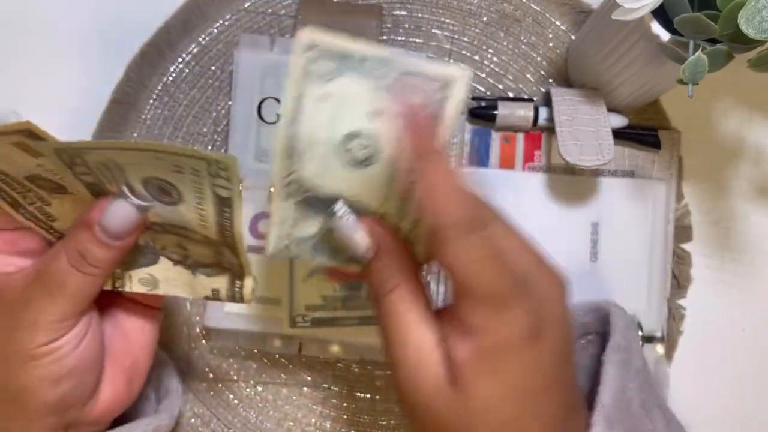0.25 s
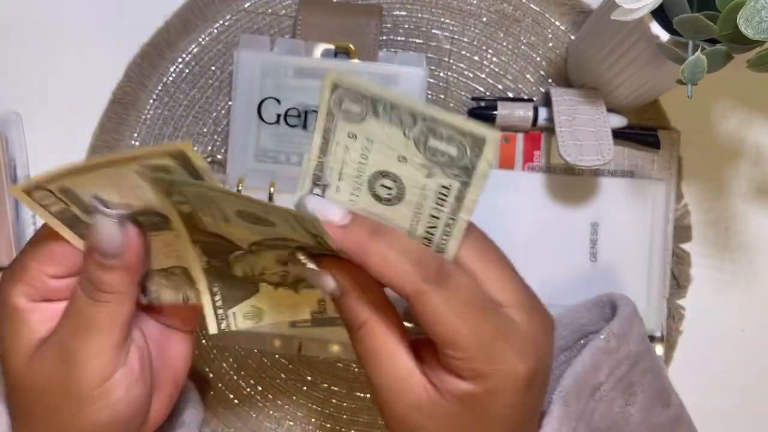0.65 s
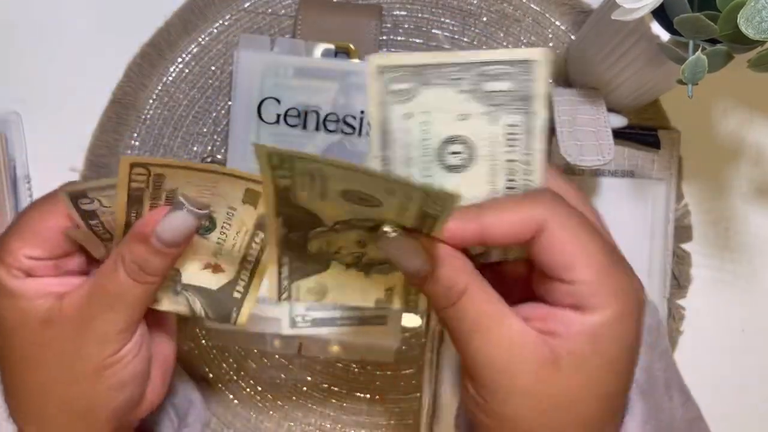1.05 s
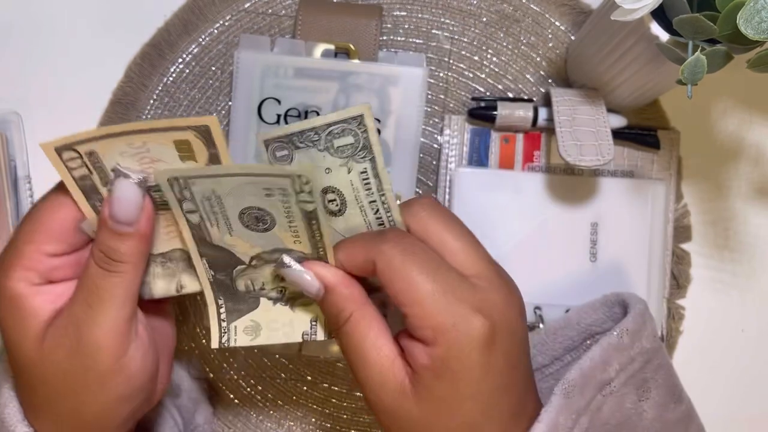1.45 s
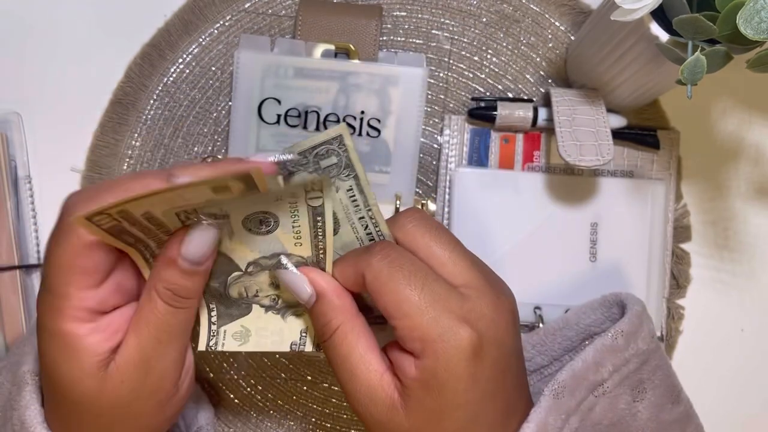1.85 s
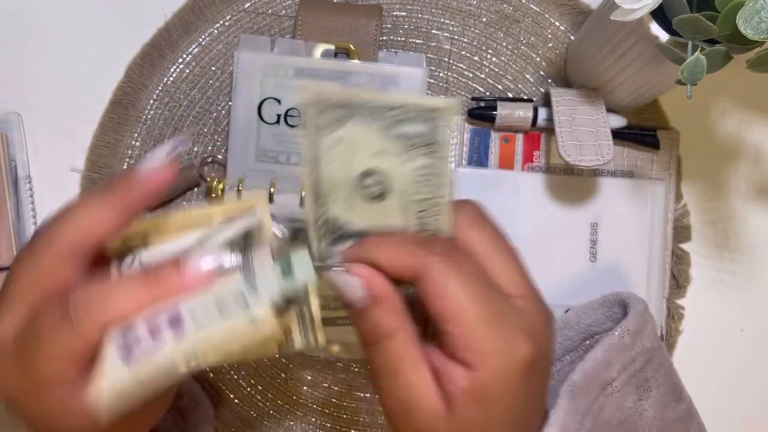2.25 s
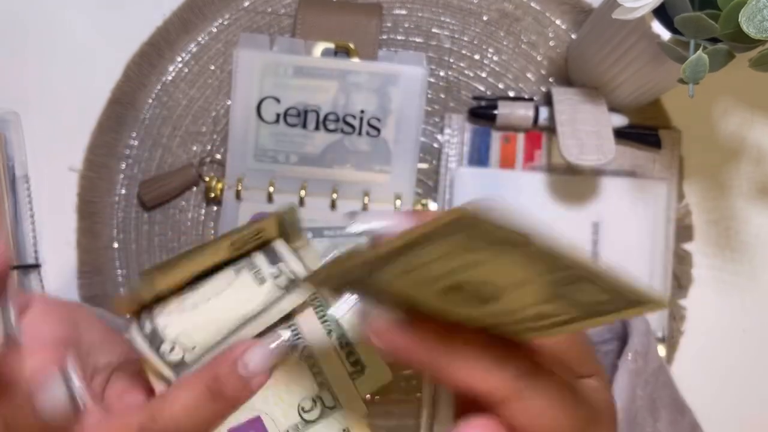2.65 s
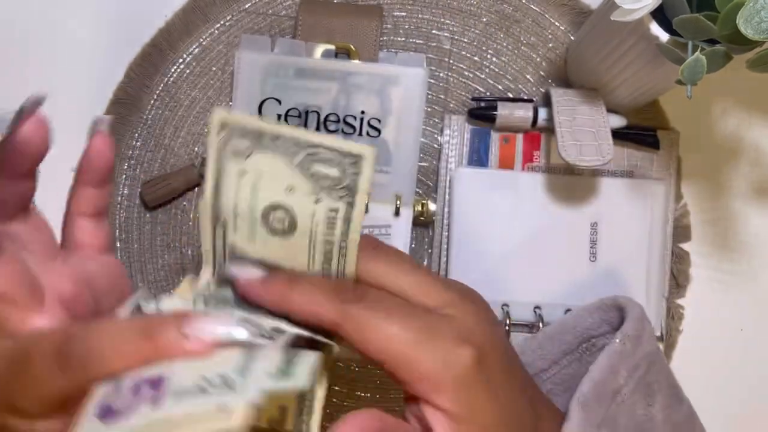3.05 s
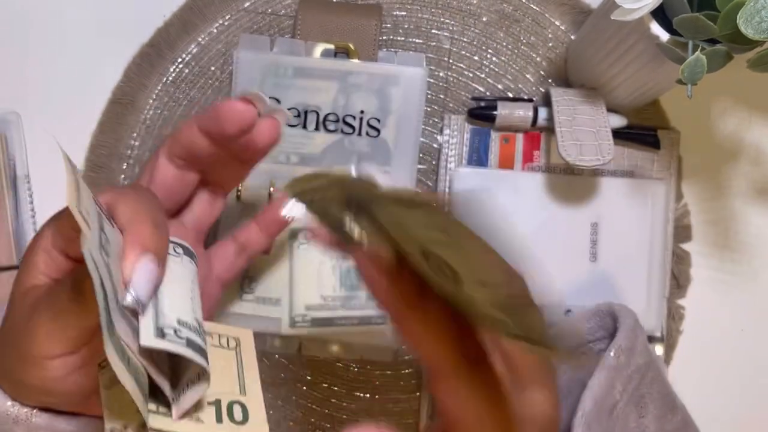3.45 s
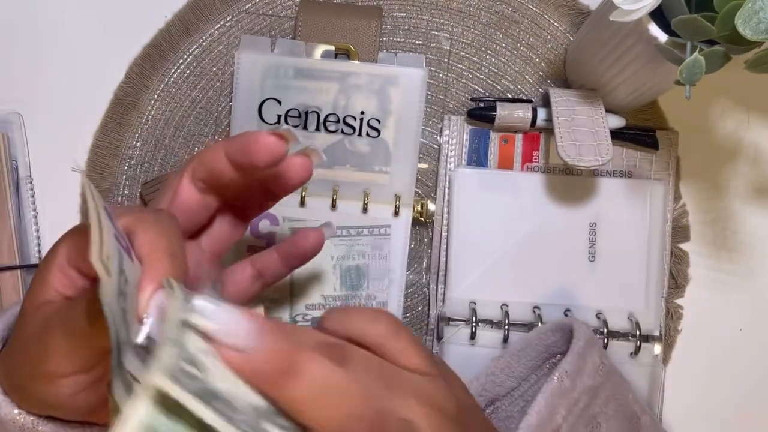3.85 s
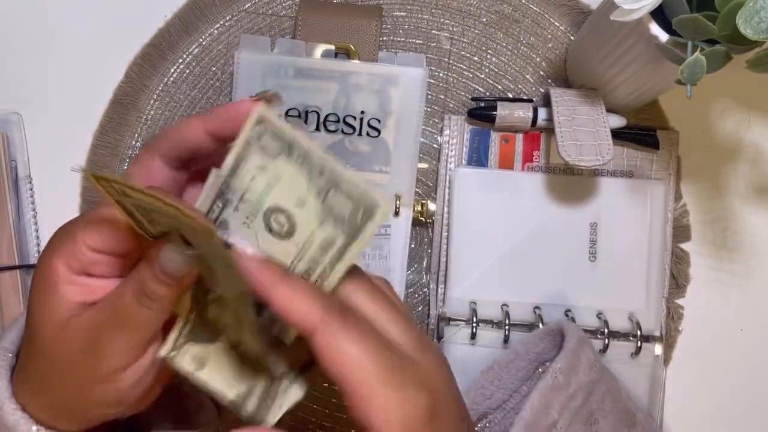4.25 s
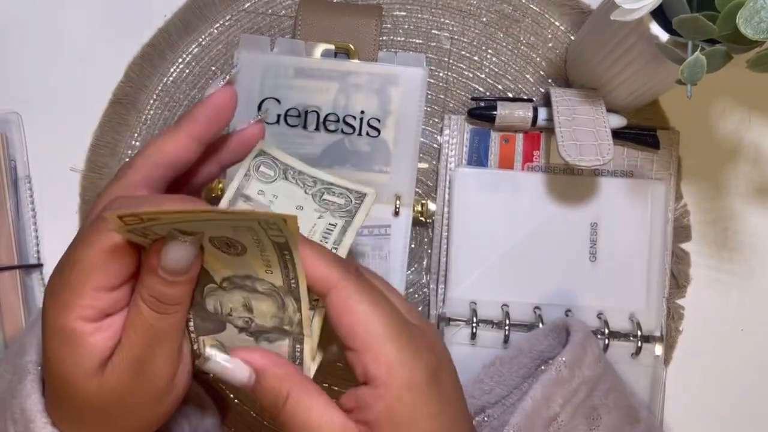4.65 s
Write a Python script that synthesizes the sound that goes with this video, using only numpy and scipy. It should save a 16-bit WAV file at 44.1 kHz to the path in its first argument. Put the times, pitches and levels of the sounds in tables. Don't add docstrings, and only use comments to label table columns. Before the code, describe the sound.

Hands count paper banknotes at a desk, very close to a stereo microphone. Dry hissing slides and crisp flicks come first, then quieter crackles as the notes are squared. The loudest snaps and flaps hit just before three seconds, followed by brisk rustling, another sharp flick near 3.9 and faint tucking crinkles. Quiet, dull room.

```python
import sys
import numpy as np
from scipy import signal
from scipy.fft import rfft, irfft
from scipy.io import wavfile
from scipy.ndimage import uniform_filter1d

SR = 44100
rng = np.random.default_rng(int(sys.argv[2]) if len(sys.argv) > 2 else 0)


def volts(x):
    e = np.asarray(x, float) / 20
    return 10 ** e


def pcm_store(signal):
    levels = np.round(np.clip(np.atleast_2d(signal), -1, 1) * 32767)
    wavfile.write(sys.argv[1], SR, levels.astype(np.int16).T)


N = 215604


def at_hz(points, hz):
    return np.interp(np.log(hz), np.log(np.array(points)[:, 0]), np.array(points)[:, 1])


def rms_one(x):
    return x / np.sqrt(np.mean(x ** 2) + 1e-20)


def drift(rate):
    r = np.exp(-16 * np.pi * rate / SR)
    slow = signal.lfilter([1], [1, -2 * r, r * r], rng.standard_normal(N // 8 + 4002))[4000:]
    return np.interp(np.arange(N) / 8, np.arange(len(slow)), rms_one(slow))


def band(x, low_hz, high_hz):
    return signal.sosfilt(signal.butter(2, [low_hz, high_hz], "band", fs=SR, output="sos"), x)


def swell(t, peak_s, rise_db_per_s, fall_db_per_s):
    ahead = peak_s[:, None] - t
    rise = ahead * np.reshape(rise_db_per_s, (-1, 1))
    fall = -ahead * np.reshape(fall_db_per_s, (-1, 1))
    return -np.maximum(rise, fall)


def shaped(x, points):
    hz = np.maximum(np.fft.rfftfreq(N, 1 / SR), 1)
    return rms_one(irfft(rfft(x) * volts(at_hz(points, hz)), N))


def fibres(per_s, spread_db, smooth):
    shape = (2, 2, N)
    sizes = volts(spread_db * np.minimum(rng.exponential(1, shape[1:]), 4)) * rng.choice([-1, 1], shape)
    clicks = rms_one(sizes * (rng.random(shape[1:]) < per_s / SR))
    return clicks + smooth * rng.standard_normal(shape)


def slide(clump_db, flutter_db, patchy_db, hollow_db):
    # start_s, level_db, crisp_db (low when palms cover the paper)
    contact_table = [(0.0, -60.5, 5), (0.27, -64.5, 1.5), (0.8, -57, 1), (1.018, -58, 1), (1.18, -71, -28),
                     (1.4, -73, 21), (1.62, -58.5, -14), (2.07, -49.5, -27), (2.31, -55.5, -14.5),
                     (2.515, -82, -10), (2.579, -55.5, -6), (3.27, -51.5, -12), (3.33, -65, -24),
                     (3.61, -68.5, -20.5), (3.92, -59.5, -3.5), (4.061, -93.5, -15), (4.126, -59.5, -4),
                     (4.86, -62, -14)]
    # pitch_hz, level_db, share of crispness
    contact_colour = [(350, 6, 0.28), (1000, 4, 0.15), (2500, 4.5, 0.062), (3200, -0.5, 0.39),
                      (7040, 3, 0.74)]
    # peak_s, level_db, swell_s, fade_s, hollow_hz
    pull_table = [(0.023, -52, 0.4, 0.053, 2000), (0.307, -48.5, 0.0047, 0.33, 2500),
                  (0.398, -42, 0.042, 0.042, 2840), (0.579, -41.5, 0.057, 0.079, 3200),
                  (1.105, -43.5, 0.057, 0.04, 3700), (1.299, -51, 0.093, 0.95, 2820),
                  (1.734, -41, 0.034, 0.017, 2600), (1.965, -43.5, 0.2, 0.1, 2610),
                  (2.161, -41.5, 0.049, 0.074, 2190), (2.244, -32, 0.06, 0.028, 2900),
                  (2.745, -43.5, .003, 0.26, 2780), (2.84, -43, 0.036, 0.092, 2260),
                  (2.929, -40.5, 0.092, 0.16, 2575), (3.029, -40, 0.027, 0.022, 2600),
                  (3.122, -41.5, 0.1, 0.12, 3200), (3.209, -35, 0.044, 0.0071, 3340),
                  (3.25, -52.5, 0.075, 0.14, 2450), (3.667, -39.5, 0.023, 0.025, 2050),
                  (3.695, -38, 0.049, 0.06, 2500), (3.838, -47, 0.064, 0.02, 2050),
                  (3.879, -37.5, 0.019, 0.026, 3065), (4.13, -46.5, 0.0069, 0.018, 2740),
                  (4.655, -45, 0.088, .02, 2830), (4.679, -40, 0.018, 0.017, 2000),
                  (0.491, -48, 0.02, 0.016, 2800), (0.88, -57, 0.027, 1, 3020),
                  (1.29, -44.5, 0.055, 0.11, 3370), (1.39, -45, 0.21, 0.14, 3170),
                  (2.18, -54, .02, 0.02, 2970), (2.431, -51.5, 0.02, 0.011, 3200),
                  (2.17, -41, 0.013, 0.018, 3300), (2.95, -45.5, 0.017, 0.054, 5200),
                  (3.117, -37, 0.0084, 0.019, 3920), (3.208, -54, 0.018, 0.0088, 4600),
                  (3.25, -49.5, 0.014, 0.077, 5250), (3.171, -42.5, 0.012, 0.014, 6300),
                  (3.619, -49, 0.006, 0.11, 2270), (3.842, -37.5, 0.0099, 0.011, 2980),
                  (3.918, -46, 0.011, 0.018, 2980), (4.249, -47, 0.03, 0.025, 2700),
                  (4.36, -56.5, 0.22, 0.94, 3070), (4.77, -48, 0.079, 0.083, 2600),
                  (0.893, -49.5, 0.09, 0.15, 3000), (0.535, -47.5, 0.045, 0.018, 5100),
                  (3.635, -48.5, 0.017, .04, 4200), (2.755, -44.5, .012, .03, 2900),
                  (1.96, -47, 0.036, 0.046, 3400), (0.28, -45, .006, .008, 4500)]
    # pitch_hz, level_db, slope (dB per octave of hollow), taut (dB per dB of harder pull)
    pull_colour = [(352, -6.5, -18.5, 0), (910, 1.5, -8.5, 0.5), (2840, -7, -2, 0), (7650, -9, 6, 0.79)]
    # pitch_hz, density (dB per Hz)
    paper_colour = [(150, 0), (300, 2), (550, -5), (900, -5.5), (1500, -2), (2200, -4.5), (3500, 2),
                    (6000, 7.5), (7300, -9), (8500, 22.5), (10500, 4.5), (12000, -79), (13500, -107),
                    (16000, -42)]
    # pitch_hz, level_db
    diffuse_share = [(100, -28), (600, -14), (1100, -18), (1500, -28), (2200, -17), (3500, -8), (4400, -11),
                     (5000, -15), (5800, -21), (9000, -22)]

    t = np.arange(0, N + 64, 64) / SR
    s, rest_db, crisp_db = np.transpose(contact_table)
    rest_db, crisp_db = np.interp(t, s, rest_db), np.interp(t, s, crisp_db)
    peak_s, pull_db, swell_s, fade_s, hollow_hz = np.transpose(pull_table)
    pull_db = np.minimum(pull_db, -37)
    span_db, mean_pull_db = 15, -46
    stroke_db = swell(t, peak_s, span_db / np.maximum(swell_s, .003), span_db / np.clip(fade_s, .003, .45))

    grains = fibres(per_s=1500, spread_db=3.0, smooth=1.428)
    clumps = clump_db * drift(3.7) + flutter_db * drift(130)
    out, edges = 0, 140 * 2 ** np.arange(0, 7, 1 / 3)
    for k, (low, high) in enumerate(zip(edges, edges[1:])):
        hz = np.sqrt(low * high)
        contact_db, share = (at_hz(np.array(contact_colour)[:, [0, c]], hz) for c in (1, 2))
        colour_db, slope, taut = (at_hz(np.array(pull_colour)[:, [0, c]], hz) for c in (1, 2, 3))
        hollow = hollow_db * np.exp(-(np.log2(hz / hollow_hz) / 0.59) ** 2)
        pulls_db = pull_db + colour_db + slope * np.log2(hollow_hz / 2800)
        pulls_db = pulls_db + taut * (pull_db - mean_pull_db) + hollow
        power = volts(rest_db + contact_db + share * crisp_db) ** 2
        power = power + np.sum(volts(pulls_db[:, None] + stroke_db) ** 2, axis=0)
        level = np.interp(np.arange(N) / SR, t, np.sqrt(power))
        waver = volts(at_hz(paper_colour, hz) + clumps + patchy_db * drift(32.5) - 3.5)
        unlike = [[1], [volts(at_hz(diffuse_share, hz))]]
        out = out + level * waver * unlike * band(grains[k % 2], low, high)
    return out


def rumble():
    # peak_s, level_db
    gust_table = [(0.09, -62), (0.33, -56.5), (.41, -56), (0.63, -58.5), (1.14, -66), (1.97, -57),
                  (2.34, -69), (2.79, -56), (2.86, -54.5), (2.96, -44), (3.04, -51.5), (3.19, -56.5),
                  (3.27, -61.5), (3.73, -55), (3.87, -63), (4.19, -65), (4.38, -63), (4.85, -55.5)]
    # pitch_hz, density (dB per Hz)
    air_colour = [(25, -47), (40, -2), (65, 1), (120, -2), (200, -12.5), (400, -31)]
    s, db = np.transpose(gust_table)
    t = np.arange(0, N + 64, 64) / SR
    gusts = volts(db[:, None] + swell(t, s, rise_db_per_s=202, fall_db_per_s=395))
    bed = volts(-71)
    gain = np.interp(np.arange(N) / SR, t, np.hypot(bed, np.linalg.norm(gusts, axis=0)))
    gain = gain * volts(1.5 * drift(8))
    shared, apart = rng.standard_normal((2, N))
    return gain * shaped(shared, air_colour), volts(-20.0) * gain * shaped(apart, air_colour)


def hush():
    # pitch_hz, density (dB per Hz)
    floor_colour = [(150, 4), (300, 15), (1000, -36.5), (2200, -8.5), (5500, 13), (8500, 27), (11000, -6.5),
                    (12300, -13.5), (14000, -47)]
    return volts(-80.5) * shaped(rng.standard_normal(N), floor_colour)


def snaps(rows, flap_db, fizz_db, rise_s, flap_lag_s, ring_width, reach=0.074):
    t = np.arange(5000) / SR
    out, crackle = np.zeros(N + len(t)), rng.standard_normal((len(rows), 3, len(t)))
    for (s, peak_db, hz, t60), (body, sizzle, flap) in zip(rows, crackle):
        sizzle_db = fizz_db + 4.5 * np.log2(hz / 2800)
        t60 = np.clip(t60, .006, .15)
        shape = (1 - np.exp(-t / rise_s)) * volts(-60 * t / t60)
        late = (1 - np.exp(-t / flap_lag_s)) * volts(-38 * t / t60)
        ring = rms_one(band(body, hz * (1 - ring_width), hz * (1 + ring_width)))
        burst = .5 * ring + 0.87 * rms_one(band(body, max(1100, reach * hz), 7300))
        burst = shape * (burst + volts(sizzle_db + 15.5) * rms_one(band(sizzle, 7280, 10300)))
        burst = burst + late * volts(flap_db + 10.5) * rms_one(band(flap, 191, 653))
        tick = rms_one(band(body + sizzle, 900, 9500))
        tick = tick * np.exp(-((t - .0012) / 0.00018) ** 2)
        burst = burst + volts(0.22 * (peak_db + 14.5) - 9.5) * tick
        at = round(s * SR)
        out[at:at + len(t)] += volts(peak_db - 4.5) * burst
    return out[:N]


def flicks():
    # start_s, peak_db, pitch_hz, t60_s
    flick_table = [(0.023, -34.5, 6360, 0.028), (0.302, -30.5, 5420, 0.041), (0.3975, -24, 2340, 0.018),
                   (0.5495, -22.5, 2340, 0.021), (1.905, -44, 2210, 0.024), (2.239, -29.5, 7200, 0.038),
                   (2.843, -15.5, 7320, 0.015), (2.9168, -13, 2740, 0.025), (2.9512, -12, 1340, 0.014),
                   (3.233, -33, 2050, 0.023), (3.708, -22.5, 7300, 0.019), (3.809, -39, 1790, 0.057),
                   (3.869, -27, 4050, 0.03), (3.885, -18, 3920, 0.022), (4.094, -42.5, 1990, 0.011),
                   (4.122, -43.5, 6287, 0.019), (4.425, -50.5, 2400, 0.15), (4.658, -36, 2802, 0.021),
                   (4.6745, -30, 2770, 0.036), (4.718, -38, 1780, 0.023), (4.822, -45, 2260, 0.083)]
    return snaps(flick_table, flap_db=-19.5, fizz_db=-13.5, rise_s=0.0012, flap_lag_s=0.0041, ring_width=0.036)


def ticks():
    # start_s, peak_db, pitch_hz, t60_s
    tick_table = [(0.1935, -35, 6800, 0.012), (0.693, -44, 12200, 0.021), (3.694, -32, 6530, 0.006),
                  (3.917, -39.5, 6500, 0.0097), (4.212, -51, 3920, 0.092), (4.633, -56, 6600, 0.026),
                  (4.718, -71, 6500, 0.015), (4.839, -50.5, 6250, 0.017)]
    return snaps(tick_table, flap_db=-16, fizz_db=-8.5, rise_s=0.00019, flap_lag_s=0.0068, ring_width=0.19)


def narrow_bursts(rows):
    t = np.arange(4000) / SR
    band_share, rise_cycles = 0.2, 1.6
    out = np.zeros(N + len(t))
    for (s, peak_db, hz, t60), noise in zip(rows, rng.standard_normal((len(rows), len(t)))):
        shape = (1 - np.exp(-t * hz / rise_cycles)) * volts(-60 * t / max(t60, .004))
        burst = rms_one(band(noise, hz * (1 - band_share), hz * (1 + band_share)))
        at = round(s * SR)
        out[at:at + len(t)] += volts(peak_db) * shape * burst
    return out[:N]


def pops():
    # start_s, peak_db, pitch_hz, t60_s
    pop_table = [(.1935, -38, 7200, 0.01), (.301, -37, 5560, 0.018), (.3985, -43.5, 12500, .012),
                 (0.552, -26, 3000, .008), (.594, -47, 10500, .02), (.6935, -44, 12600, .012),
                 (1.3015, -26, 7040, .006), (2.4295, -49, 11500, .02), (2.7522, -33.5, 2890, 0.02),
                 (2.843, -16.5, 6400, 0.011), (2.9175, -24, 10700, 0.013), (2.9455, -33, 6800, .012),
                 (2.951, -20, 10700, 0.011), (2.952, -16.5, 1133, 0.013), (3.032, -42.5, 297, 0.042),
                 (3.11, -35, 10800, 0.059), (3.131, -30, 2600, 0.014), (3.132, -36, 7000, .01),
                 (3.139, -29, 1800, 0.015), (3.205, -34, 10700, .03), (3.243, -37, 10400, 0.038),
                 (3.281, -41, 10800, 0.038), (3.623, -47, 11000, .02), (3.695, -31, 11100, .012),
                 (3.7094, -31, 10800, 0.025), (3.878, -31, 590, 0.051), (3.8868, -21, 11100, .012),
                 (4.0945, -52.5, 3000, 0.0047), (4.121, -62, 11960, 0.027), (4.659, -32, 605, 0.024),
                 (4.672, -46, 11000, .02), (4.677, -41, 555, 0.046), (4.718, -49, 2500, 0.0051),
                 (4.84, -49, 10500, .012)]
    return narrow_bursts(pop_table)


def glints():
    # start_s, level_db, t60_s
    glint_table = [
        (0.302, -48, .03),
        (0.378, -48, 0.12),
        (0.6935, -41, .02),
        (2.15, -46, .12),
        (2.748, -50, .08),
        (2.8425, -30, .012),
        (2.937, -47, .1),
        (2.951, -38, .02),
        (3.14, -48, .2),
        (3.875, -44, .05),
    ]
    t = np.arange(N) / SR
    level = sum(volts(db - 60 * np.maximum(t - s, 0) / max(t60, .005)) * (t > s) for s, db, t60 in glint_table)
    return band(level * rng.standard_normal(N), 13540, 15500) * 2


def creases():
    # start_s, peak_db, pitch_hz, t60_s
    crease_table = [(0.3985, -33, 3550, 0.046), (0.5825, -30, 3830, 0.064), (1.0595, -50, 3200, 0.018),
                    (2.0315, -37, 2250, 0.015), (4.117, -53, 2500, .04), (0.6935, -34, 3760, 0.03),
                    (0.699, -29.5, 2420, 0.025), (1.274, -36, 3030, 0.18), (1.3008, -27, 3920, 0.02),
                    (1.48, -46.5, 3180, 0.16), (2.232, -28.5, 3020, 0.024), (2.456, -42, 2140, 0.0072),
                    (2.62, -42.5, 1850, 0.02), (2.752, -33.5, 2700, 0.055), (3.111, -29, 3850, 0.045),
                    (2.779, -36, 3050, 0.17), (2.898, -37, 1840, 0.0055), (3.615, -33, 2320, 0.01),
                    (3.649, -37.5, 2120, 0.17), (4.133, -37.5, 2560, 0.015), (4.239, -36, 5800, 0.018)]
    return snaps(crease_table, flap_db=-33.5, fizz_db=-20.5, rise_s=0.00064, flap_lag_s=0.015,
                 ring_width=0.096, reach=0.4)


def thumps():
    # start_s, peak_db, pitch_hz, t60_s
    thump_table = [(0.494, -46.5, 234, 0.092), (0.716, -51, 220, .08), (.905, -47, 275, 0.097),
                   (1.105, -45, 237, 0.089), (1.735, -44.5, 250, 0.064), (1.735, -44, 600, 0.048),
                   (2.42, -51.5, 260, 0.086), (2.847, -25, 332, 0.034), (3.235, -38, 470, .04),
                   (4.2395, -44, 5800, .008), (3.6155, -42, 2300, 0.0089), (3.8083, -37, 1900, 0.013),
                   (0.4, -36, 3000, 0.0068), (2.745, -45, 4000, .02)]
    return narrow_bursts(thump_table)


def crinkles(level_db):
    # start_s, peak_db, pitch_hz
    crinkle_table = [(1.081, -40, 4020), (1.096, -30, 4100), (1.2551, -36, 3620), (1.2646, -38, 3630),
                     (1.301, -18, 3630), (1.472, -32, 2340), (1.7049, -39.5, 2010), (1.72, -39, 2540),
                     (1.7677, -42, 2100), (2.1464, -50, 2530), (2.1577, -27, 3370), (2.178, -28.5, 1940),
                     (2.2158, -29, 3150), (4.1773, -43, 3110), (4.2127, -47, 3910), (4.263, -47, 2300),
                     (0.49, -51, 3500), (0.498, -47, 2980), (0.636, -33, 2500), (2.045, -41, 2600),
                     (0.7268, -43.5, 1800),
        (0.7817, -65, 4330),
        (0.8336, -46, 6200),
        (0.981, -47, 3350),
        (1.061, -35, 3820),
                     (1.767, -47, 2100),
        (1.8587, -43.5, 2480),
        (1.8744, -37, 2360),
        (1.905, -41.5, 2300),
        (1.936, -30.5, 2290),
        (2.032, -37, 2170),
                     (4.33, -46, 3600),
        (4.343, -47, 2430),
        (4.363, -41, 3210),
        (4.4225, -58, 2200),
        (4.4407, -46.5, 2480),
        (4.5497, -61, 2260),
        (4.5636, -55, 2970),
        (4.61, -50.5, 2260),
        (4.633, -50, 2230),
        (4.6573, -35, 2900),
    ]
    rows = crinkle_table
    t = np.arange(1500) / SR
    out, shape = np.zeros(N + len(t)), (1 - np.exp(-t / 0.00045)) * volts(-60 * t / 0.013)
    noise = band(rng.standard_normal((len(rows), len(t))), 1230, 10000)
    for (s, peak_db, hz), one in zip(rows, noise):
        r = np.exp(-np.pi * 0.18 * hz / SR)
        ring = signal.lfilter([1, 0, -1], [1, -2 * r * np.cos(2 * np.pi * hz / SR), r * r], one)
        at = round(s * SR)
        out[at:at + len(t)] += volts(peak_db + level_db) * shape * (rms_one(ring) + volts(-7.5) * rms_one(one))
    return out[:N]


def folds():
    # start_s, peak_db, pitch_hz, t60_s
    fold_table = [(0.633, -39, 1660, 0.058), (1.638, -43.5, 1800, 0.034), (1.945, -41, 2200, 0.043),
                  (2.031, -29, 2120, 0.019), (2.109, -34, 1410, 0.031), (2.129, -35, 1500, 0.068),
                  (2.297, -39.5, 1470, 0.023), (2.813, -19.5, 2450, 0.028), (2.845, -38, 474, 0.025),
                  (3.024, -18, 2420, 0.014), (3.131, -25.5, 1630, 0.037), (3.24, -46, 463, 0.14),
                  (3.28, -43.5, 1480, 0.047), (3.678, -24, 2050, 0.021), (3.837, -34, 1680, 0.099),
                  (4.612, -40.5, 2300, 0.032), (4.788, -41.5, 1190, 0.038), (0.551, -29.5, 850, 0.052),
                  (0.586, -39, 804, 0.18), (3.68, -36.5, 517, 0.12), (4.676, -35.5, 640, 0.052)]
    buckles = snaps(fold_table, flap_db=-20.5, fizz_db=-28, rise_s=0.0027, flap_lag_s=0.0051, ring_width=.2)
    return band(buckles, 140, 3700)


def drags(waver_db):
    # start_s, end_s, level_db
    drag_table = [
        (2.523, 2.756, -58.5),
        (3.226, 3.637, -63),
    ]
    # pitch_hz, width_hz, level_db
    sleeve_table = [(272, 91, 2.5), (500, 96, 0), (940, 220, -9), (1358, 52, -2.5), (1795, 42, -6),
                    (2100, 170, -3), (2560, 130, -5)]
    edge_s, cut_hz = 0.061, 2490
    t, hz = np.arange(N) / SR, np.fft.rfftfreq(N, 1 / SR)
    colour = 0
    for k, (top_hz, width, db) in enumerate(sleeve_table):
        colour = colour + volts(db) / (1 + (2 * (hz - top_hz) / width) ** 2) ** .5 * (-1) ** k
    colour = np.abs(colour) / np.sqrt(1 + (hz / cut_hz) ** 40)
    level = sum(volts(db) * np.clip(np.minimum(t - s, end - t) / edge_s, 0, 1) for s, end, db in drag_table)
    friction = rms_one(irfft(rfft(rng.standard_normal(N)) * colour, N))
    return level * volts(waver_db * drift(25)) * friction


def sheet(x, lift_db):
    # pitch_hz, width_hz, level_db
    sheet_table = [(582, 250, 6.5), (2050, 890, 0), (2740, 290, -8.5), (3920, 39, 4), (5240, 340, -11.5),
                   (6430, 160, -1), (7320, 75, -30)]
    hz = np.fft.rfftfreq(N, 1 / SR)
    lift = sum((lift_db + 0.51 * db) / (1 + (2 * (hz - top_hz) / width) ** 2) for top_hz, width, db in sheet_table)
    return irfft(rfft(x) * volts(lift), N)


def flat(x):
    return signal.sosfilt(signal.butter(8, 13000, fs=SR, output="sos"), x)


def room(x):
    t = np.arange(SR // 2) / SR
    t60_s, first_bounce_s = 0.014, .004
    decay = volts(-60 * t / t60_s) * (t > first_bounce_s)
    tail = band(rng.standard_normal((2, len(t))), 86, 2800) * decay
    tail = tail / np.sqrt(np.sum(decay ** 2))
    return signal.fftconvolve(x[None], tail, axes=1)[:, :N]


def ports(x):
    # pitch_hz, lead_rad
    port_phase = [(0, 0), (340, -.3), (1600, 0), (3100, .5), (4050, .8), (4570, 1.8), (4700, 2.2),
                  (5050, 4.6), (5250, 5.3), (5700, 6.0), (6300, 6.55), (8200, 8.85), (9000, 9.42),
                  (9500, 9.75), (11900, 12.05), (12600, 12.3), (13700, 13.1), (16000, 14.6)]
    # pitch_hz, gap_db
    port_balance = [(60, 0.0), (120, -0.5), (240, -2.0), (480, -2.0), (950, -2.5), (1890, -0.5),
                    (3770, -1.5), (7520, 0.0), (15000, 0.0)]
    hz = np.fft.rfftfreq(N, 1 / SR)
    phase = np.interp(hz, *np.transpose(port_phase))
    gap_db = at_hz(port_balance, np.maximum(hz, 1))
    half = volts(gap_db / 2) * np.exp(.5j * phase)
    return irfft(rfft(x) * np.array([half, 1 / half]), N)


def scene():
    direct, diffuse = slide(clump_db=3.0, flutter_db=0.5, patchy_db=2.0, hollow_db=9.5)
    cracks = flicks() + ticks() + creases() + folds()
    paper = sheet(direct + cracks + crinkles(level_db=-7.0), lift_db=3.5) + drags(waver_db=1.0)
    gusts, gusts_apart = rumble()
    near = flat(paper) + gusts + hush() + glints()
    off_hand = volts(-17) * band(np.roll(cracks, 130), 2600, 5200)
    apart = flat(diffuse) + off_hand + gusts_apart
    knocks = ports(flat(pops() + thumps()))
    return ports(near) + ports(apart) * [[1], [-1]] + volts(-8) * room(paper) + knocks


def attacks(x, jump_db):
    power = band(x[0] + x[1], 3000, 15000) ** 2
    now, before = uniform_filter1d(power, 128), uniform_filter1d(power, 1023, origin=511)
    jump = 1. * (now > volts(2 * jump_db) * np.roll(before, 100))
    return uniform_filter1d(1. * (uniform_filter1d(jump, 1200) > 1e-6), 300)


def starve(x, size, ease_db, masked_db, ear_follows):
    # pitch_hz, level_db (per bin)
    audible_table = [(10500, -120), (11400, -97), (11800, -84), (12300, -78), (13200, -78), (14000, -78),
                     (16000, -79)]
    half = size // 2
    hz, _, bins = signal.stft([x[0] + x[1], x[0] - x[1]], SR, nperseg=size)
    power = np.abs(bins[:, :half]).reshape(2, 64, half // 64, -1) ** 2 * size / 2048
    budget_db = rng.normal(0, 1.7, power.shape[-1])
    budget_db = budget_db + 3 * uniform_filter1d(budget_db, 9) - ease_db
    level_db = 10 * np.log10(np.repeat(power.mean(axis=2), half // 64, axis=1) + 1e-20)
    heard = (level_db > level_db[::-1] + masked_db + budget_db) | (hz[:half, None] < 1200)
    air_db = level_db[0, (hz[:half] > 10300) & (hz[:half] < 11200)].mean(axis=0)
    louder_db = ear_follows * (air_db - np.median(air_db))
    heard &= level_db > at_hz(audible_table, hz[1:, None]) - 2 + budget_db + louder_db
    bins[:, :half] *= heard
    mid, side = signal.istft(bins, SR, nperseg=size)[1][:, :N] / 2
    return np.array([mid + side, mid - side])


def roll_off(x):
    return signal.sosfilt(signal.butter(12, 16500, fs=SR, output="sos"), x)


def record(dry):
    top = signal.butter(2, 11500, fs=SR, output="sos")
    heard = signal.sosfilt(top, dry)
    return roll_off(heard)


dry = scene()
out = record(dry)
pcm_store(out)
```